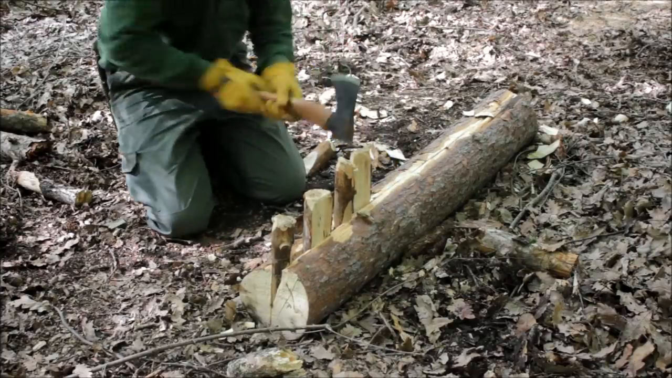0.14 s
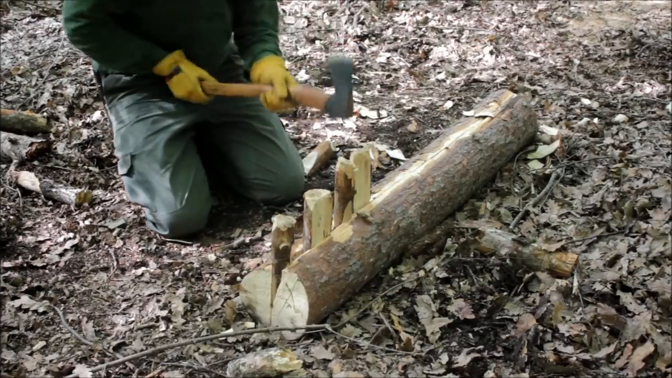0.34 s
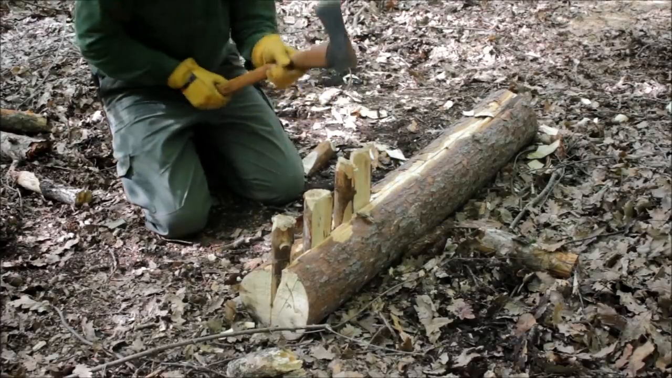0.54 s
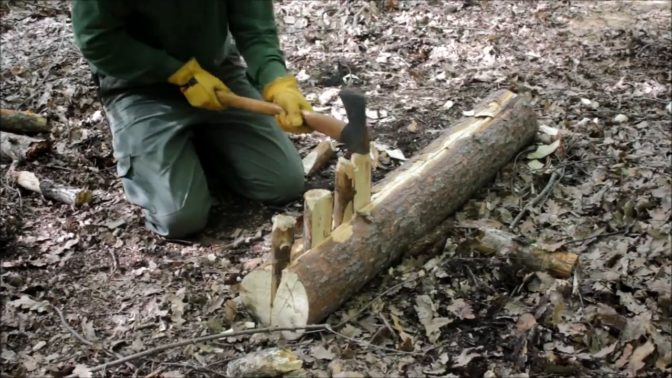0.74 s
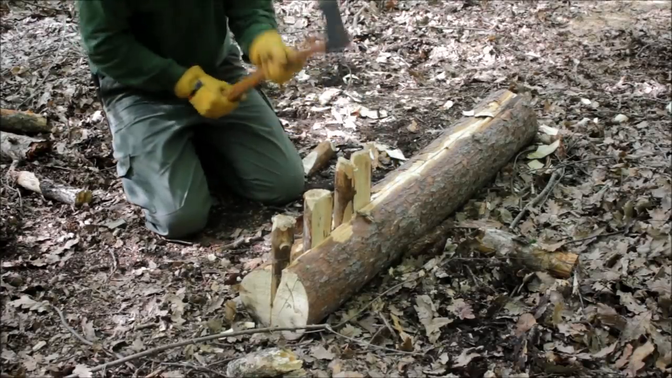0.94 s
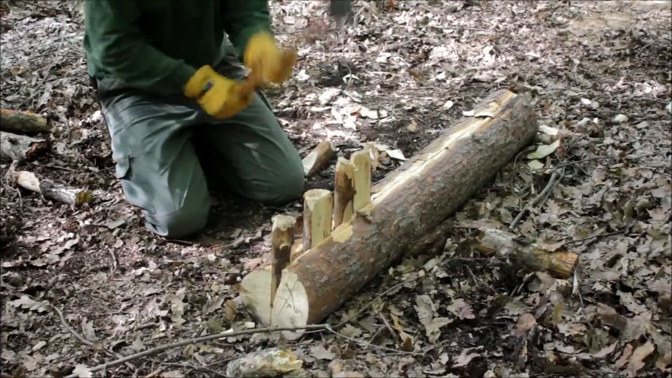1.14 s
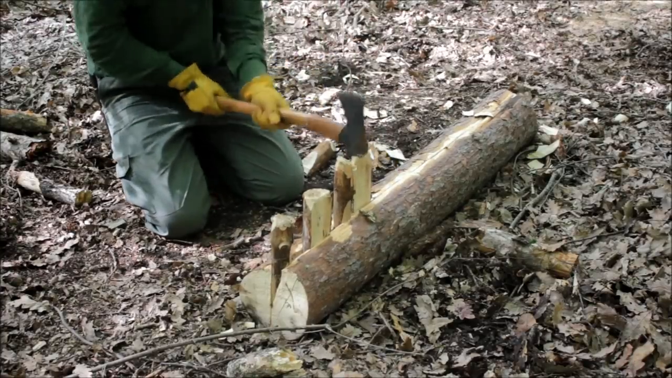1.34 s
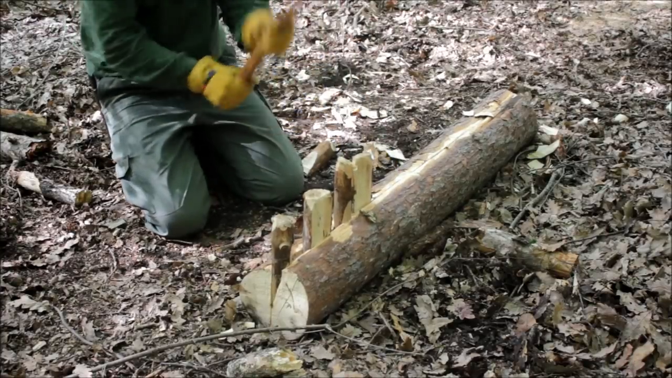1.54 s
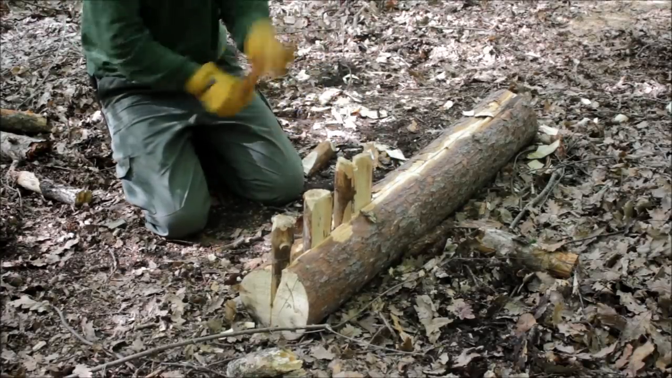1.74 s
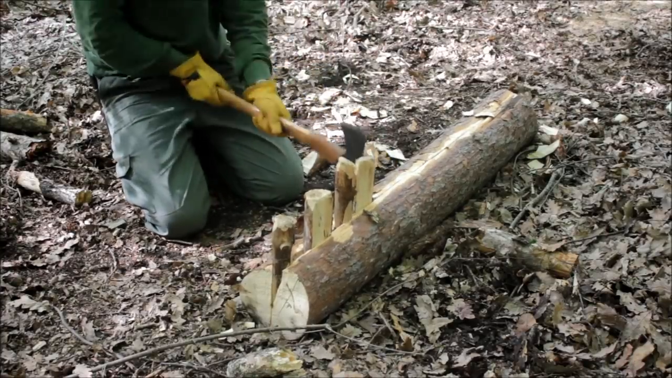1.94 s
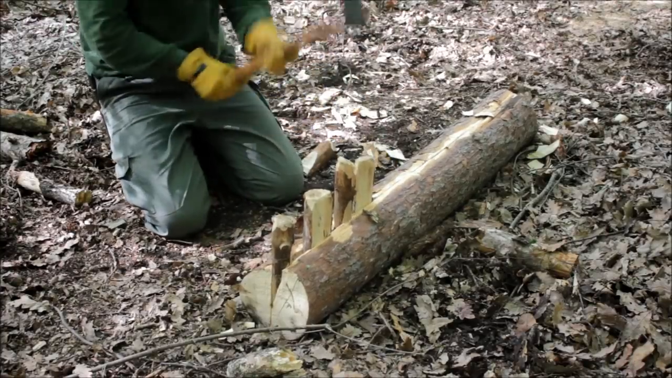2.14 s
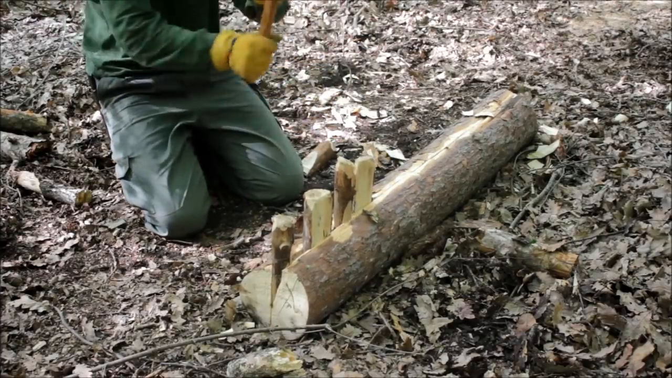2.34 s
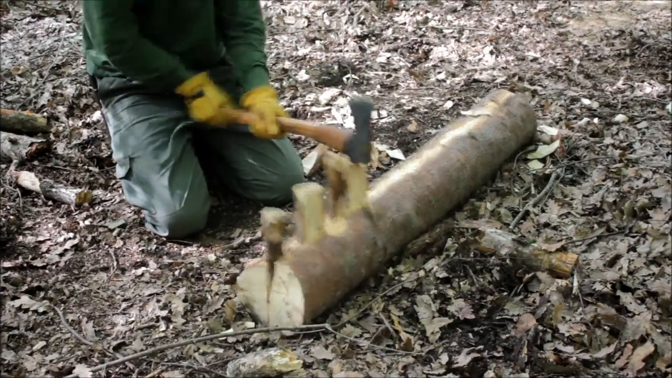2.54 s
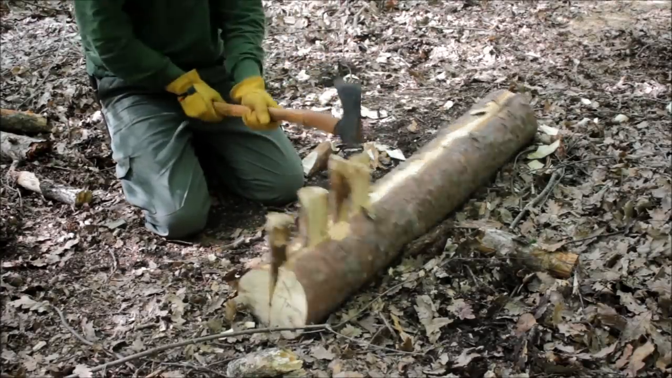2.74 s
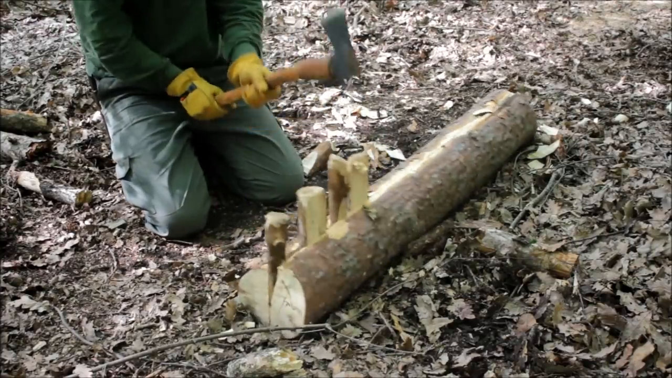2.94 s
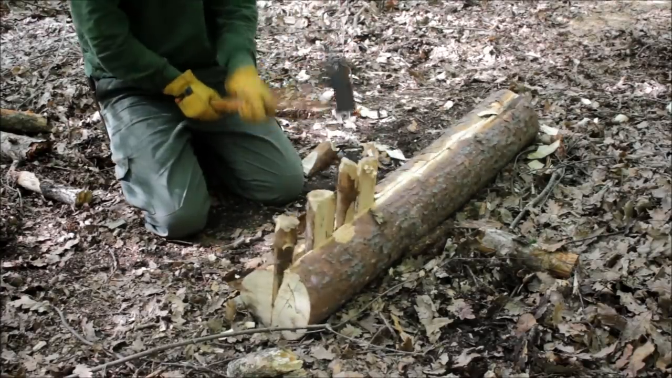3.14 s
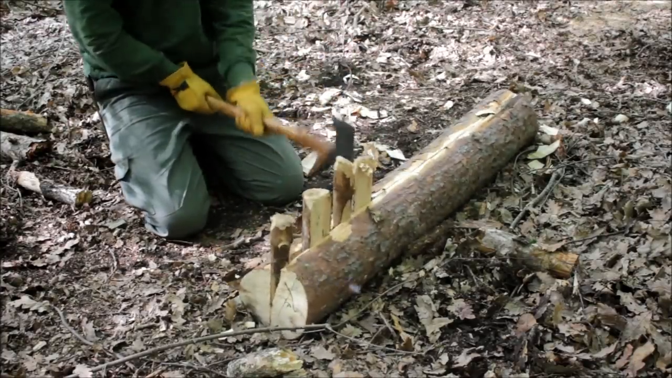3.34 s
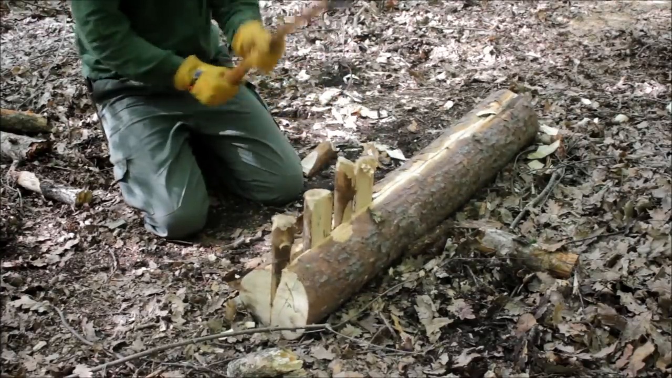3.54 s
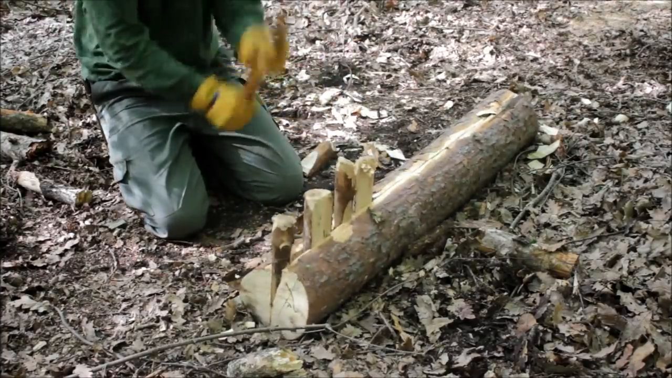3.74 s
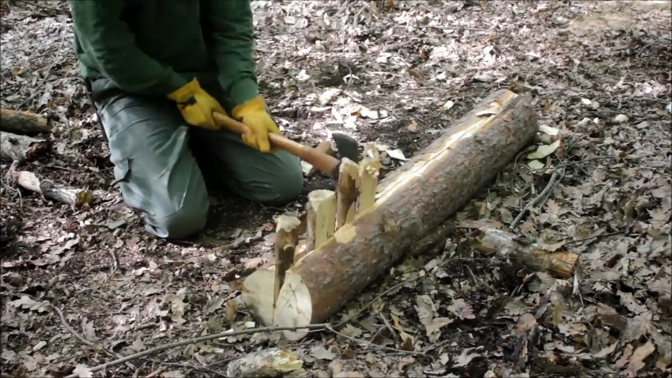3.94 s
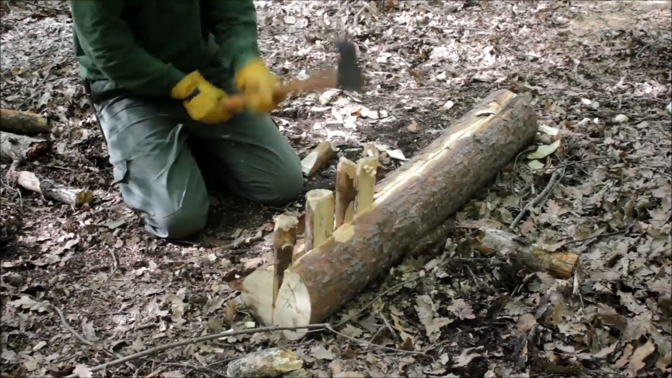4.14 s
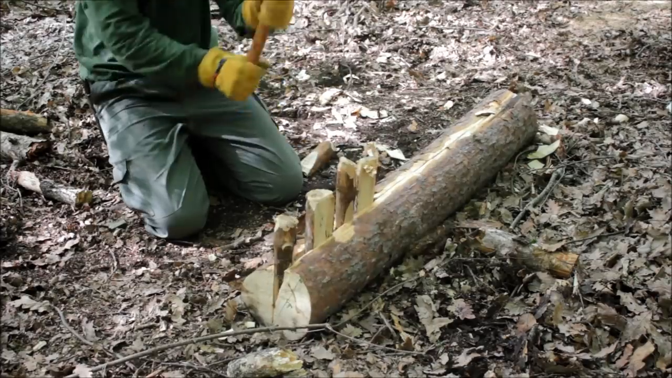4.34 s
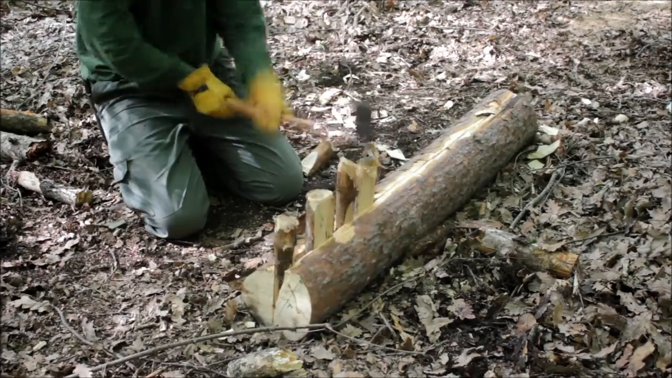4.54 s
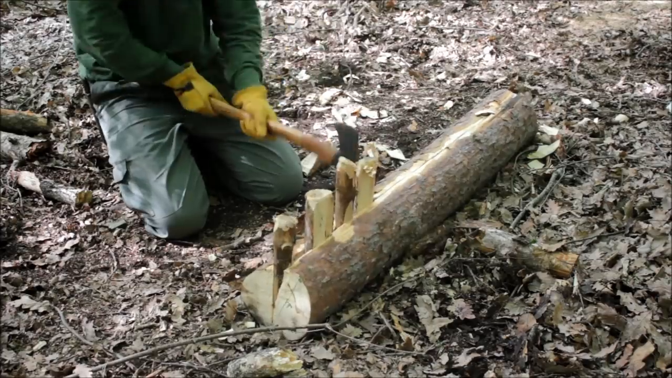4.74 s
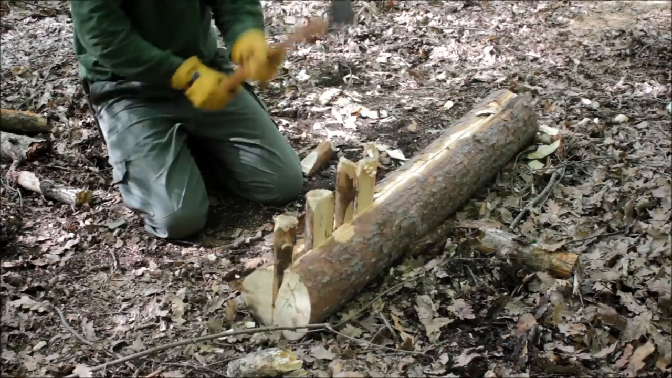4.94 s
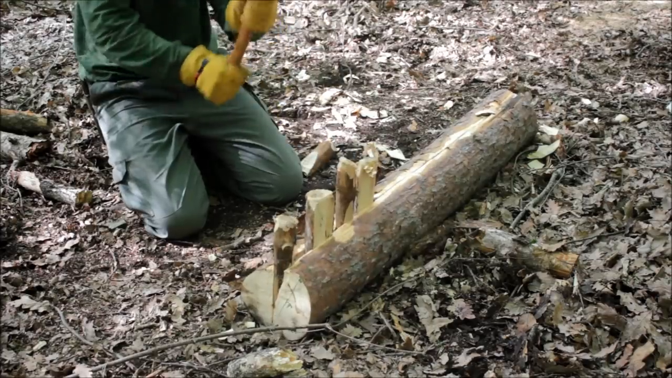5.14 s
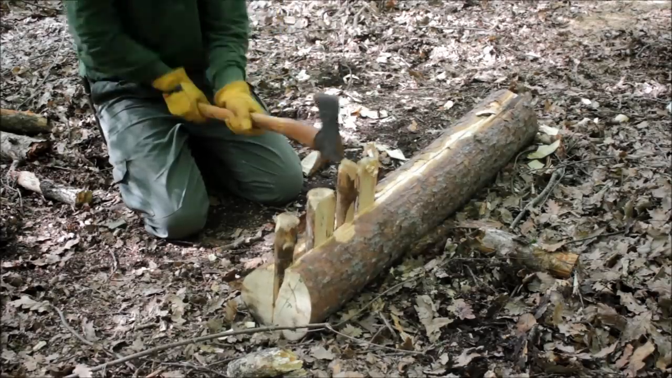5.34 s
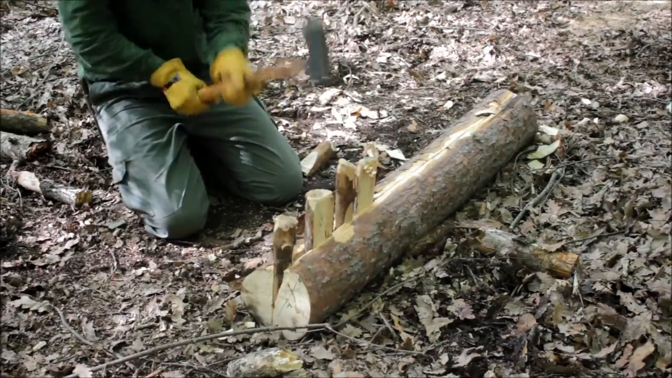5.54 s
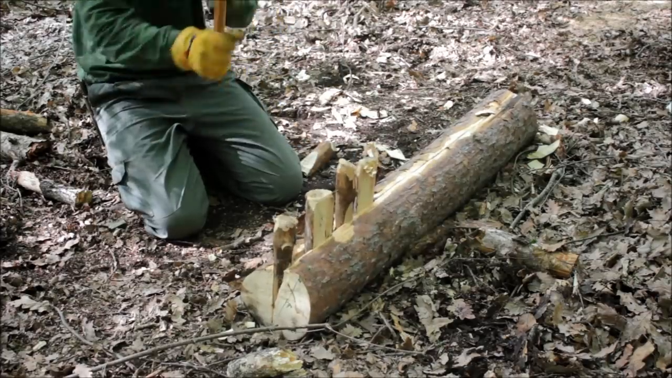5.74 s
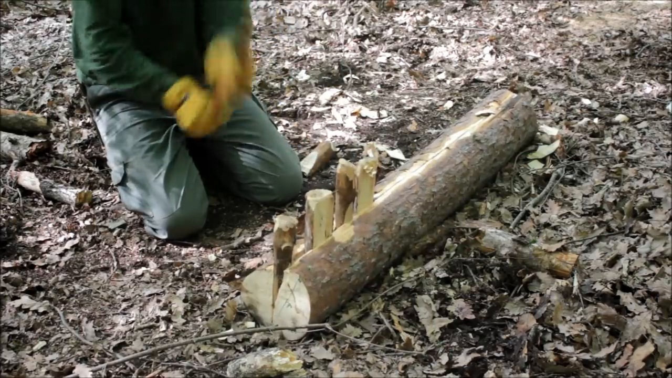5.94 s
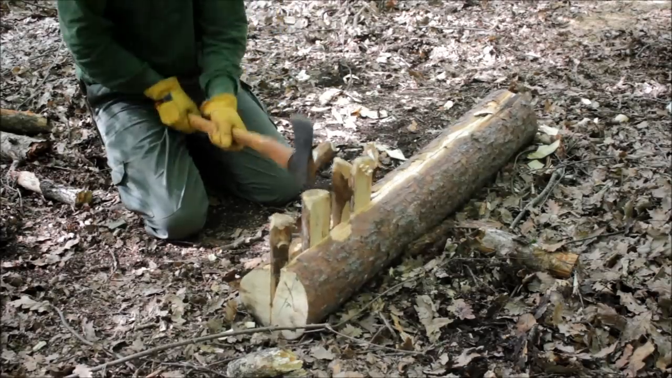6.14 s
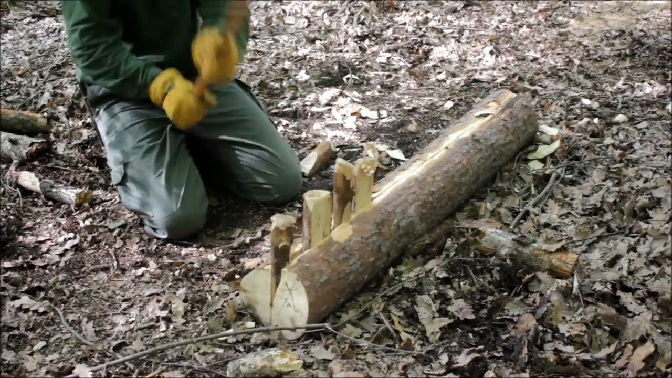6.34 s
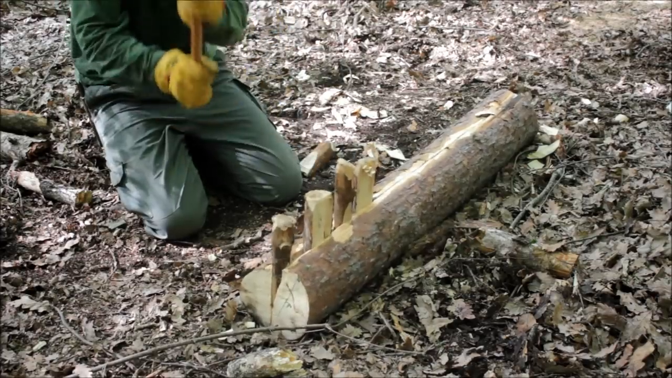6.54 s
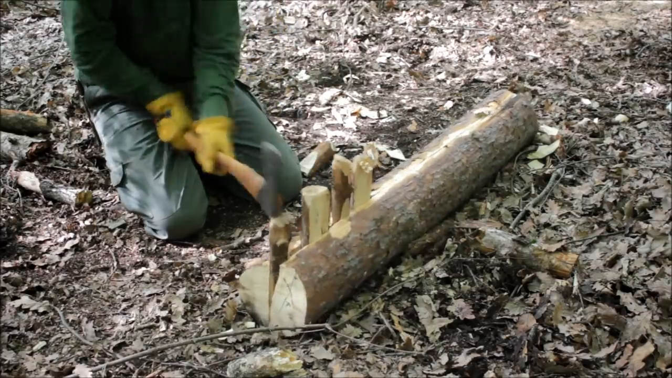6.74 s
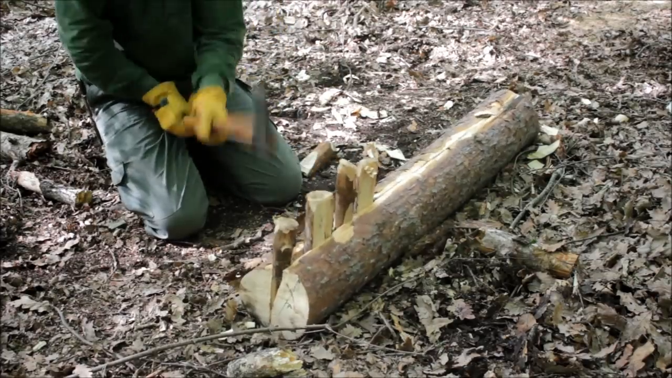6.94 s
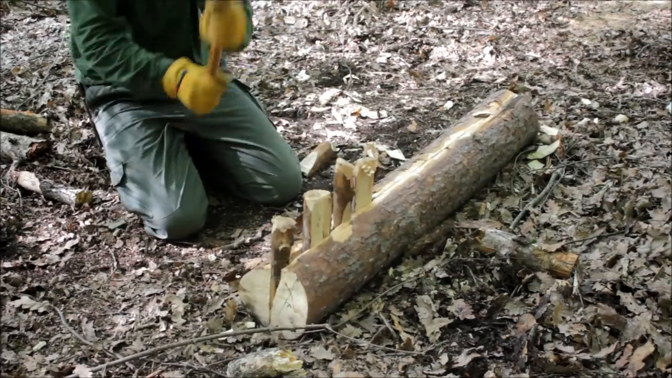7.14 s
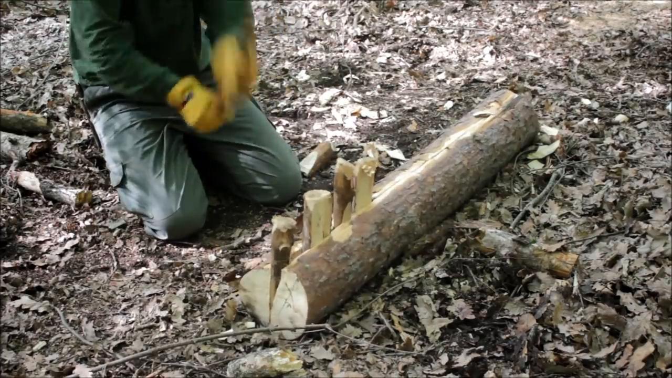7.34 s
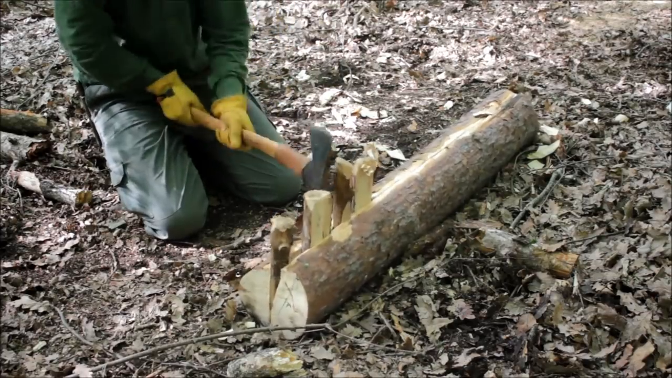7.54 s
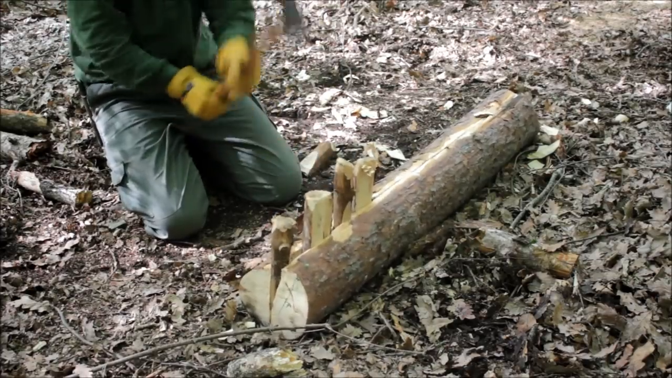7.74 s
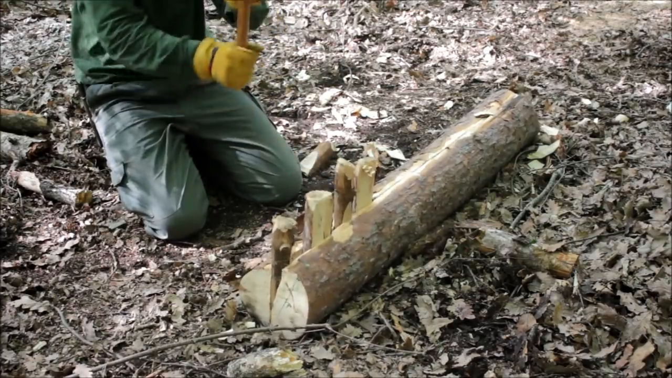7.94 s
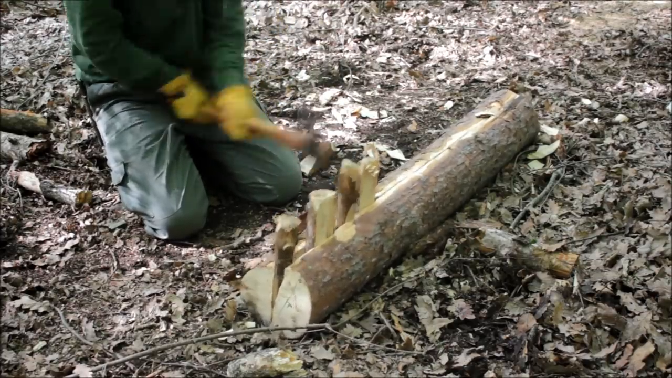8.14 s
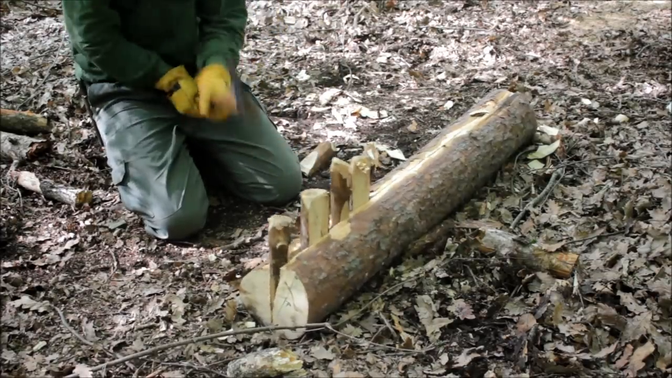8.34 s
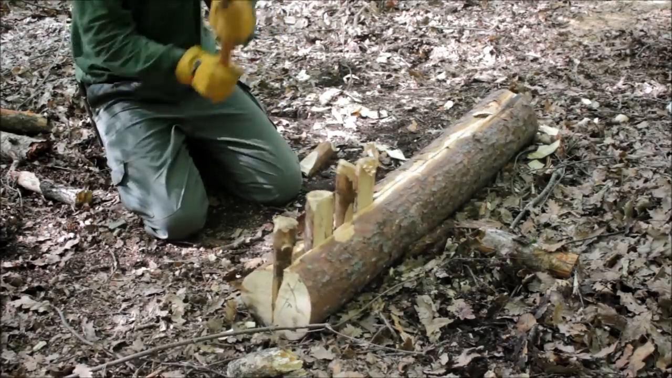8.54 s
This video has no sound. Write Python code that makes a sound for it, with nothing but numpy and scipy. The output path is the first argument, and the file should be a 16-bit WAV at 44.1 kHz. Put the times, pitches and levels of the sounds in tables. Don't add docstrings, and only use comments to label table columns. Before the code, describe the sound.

An axe head pounds wooden wedges in a log at an even pace, each crack clipping loudly, with leaf ticks, faint birdsong and low hum.

```python
import sys
import numpy as np
from scipy import signal
from scipy.fft import rfft, irfft
from scipy.io import wavfile
from scipy.ndimage import uniform_filter1d

SR = 44100
rng = np.random.default_rng(int(sys.argv[2]) if len(sys.argv) > 2 else 0)


def gain_from_db(level_db):
    decades = np.asarray(level_db, float) / 20
    return 10 ** decades


def generate_wav(sig):
    pcm = np.round(np.clip(np.atleast_2d(sig).T, -1, 1) * 32767).astype(np.int16)
    wavfile.write(sys.argv[1], SR, pcm)


N = 379701

# [f/Hz, level/dB per Hz]
WIND_COLOUR = [(20, -25.5), (60, 7.5), (170, -3.5), (400, 0), (800, -10.5), (1500, -16), (3000, -14.5),
               (7000, -17), (12000, -16.5), (16000, -22.5)]
# [f/Hz, level/dB per Hz]
ENGINE_COLOUR = [(35, -13.5), (55, -10.5), (75, 5.5), (95, 5), (130, -40.5)]
# [t/s, level/dB]
ENGINE_LEVEL = [(0.0, -61), (2.18, -59), (2.54, -61), (2.9, -54.5), (5.2, -55.5), (5.35, -57.5),
                (7.17, -86.5), (7.29, -61), (7.63, -65), (8.01, -60), (8.34, -83), (8.61, -60)]
# [f/Hz, level/dB per Hz]
CLOTH_COLOUR = [(80, -4), (300, 5.5), (1000, 4), (3000, 4), (6000, 2.5), (12000, 0.5), (15500, -5.5)]
# [middle t/s, half length/s, level/dB]
RUSTLES = [(0, .1, -48), (0.147, 0.054, -48.5), (0.287, 0.06, -52.5), (0.42, 0.17, -57.5),
           (.568, .024, -62), (1.016, 0.06, -52.5), (2.28, 0.13, -52), (2.803, 0.052, -49),
           (2.94, .055, -56.5), (3.156, 0.055, -56), (4.027, .079, -50), (4.265, 0.15, -57),
           (6.416, 0.087, -56), (7.31, 0.024, -49), (7.925, 0.15, -58.5), (8.27, 0.12, -46.5)]
# [t/s, peak level/dB, brightness/dB]
LEAF_TICKS = [(1.777, -40.5, -8), (2.4254, -36.5, -4), (3.252, -15, 1.5), (3.532, -37, -4.5),
              (3.715, -37, 5), (4.437, -35.5, 1), (4.6972, -32, -2), (5.064, -27, 14), (5.201, -37.5, -3.5),
              (5.5593, -35, 2), (5.627, -35.5, -2), (5.857, -32, -2.5), (6.3664, -22.5, 0.5),
              (6.543, -36, -5), (6.6644, -35, 3), (6.6797, -35, 1), (6.8914, -29.5, -3), (6.984, -29.5, -1),
              (7.185, -36.5, -10), (7.358, -34, 1.5), (7.629, -29.5, -1), (7.6725, -32.5, -1),
              (7.878, -33, 6), (7.966, -35, -4), (8.0227, -32.5, -6), (8.0586, -34.5, 0), (8.3953, -31, 9),
              (8.434, -28.5, -1), (8.4751, -34, -2)]
# [t/s, peak level/dB, brightness/dB]
CHIP_SKIPS = [
    (8.205, -25, 8.5),
    (8.2085, -21, -4),
    (8.246, -23, 5),
    (8.278, -25.5, -3),
    (8.3082, -24.5, 0),
]
# [t/s, peak level/dB, brightness/dB]
KNEE_CRACKLE = [
    (7.215, -46, 14),
    (7.277, -37, 6),
    (7.368, -33, 8),
    (7.697, -38, 16),
    (7.737, -36, 16),
    (7.75, -36, 16),
    (7.766, -37, 11),
    (7.855, -45, -3),
]
# [t/s, length/s, start f/Hz, end f/Hz, level/dB]
CREAKS = [
    (4.048, 0.064, 180, 300, -42.5),
    (4.071, 0.032, 358, 386, -39.5),
]
# [t/s, start f/Hz, level/dB]
RISING_NOTES = [
    (2.428, 4060, -52.5),
    (2.882, 3890, -49.5),
    (3.345, 4060, -57),
    (6.24, 4330, -63),
    (6.588, 4280, -52),
    (6.971, 4150, -56.5),
    (7.175, 4310, -56.5),
    (7.79, 4090, -54.5),
]
# [t/s, length/s, start f/Hz, level/dB]
SAGGING_NOTES = [
    (0, .13, 7400, -51),
    (.77, .13, 4520, -53),
    (2.693, .07, 4880, -52),
    (3.13, .08, 4800, -52),
    (3.36, .14, 8300, -62),
    (4.337, .12, 4620, -51),
    (5.96, .07, 4580, -48),
    (8.078, .074, 6850, -46),
    (8.365, .042, 7800, -50),
]
# [t/s, length/s, start f/Hz, end f/Hz, level/dB]
SLIDING_NOTES = [(2.82, .035, 4610, 5000, -52), (2.887, 0.023, 3180, 3670, -42),
                 (2.923, 0.023, 3815, 4130, -40), (3.572, .024, 4780, 3960, -43),
                 (3.596, 0.019, 4260, 3610, -38), (3.646, 0.022, 3730, 3110, -41),
                 (3.68, 0.0039, 3050, 2686, -46), (3.742, 0.0096, 3560, 3950, -44),
                 (3.779, 0.011, 4040, 3200, -42.5), (3.819, 0.0072, 5050, 4240, -41),
                 (4.476, .08, 4400, 3860, -54.5), (6.445, 0.058, 4580, 5690, -52.5),
                 (7.9, .02, 8250, 8450, -53), (8.07, 0.02, 6100, 6750, -53),
                 (8.343, .033, 6360, 7700, -50.5)]
# [t/s, level/dB]
TRILL_CHIRPS = [
    (8.526, -46),
    (8.535, -36),
    (8.549, -40.5),
    (8.564, -40),
    (8.58, -41.5),
    (8.594, -53),
]
# [t/s, length/s, start f/Hz, end f/Hz, level/dB]
DIVING_NOTES = [
    (7.908, 0.095, 8400, 6050, -45.5),
    (8.405, .033, 6800, 6400, -45),
    (0.78, .05, 4350, 3850, -53),
]
# [f/Hz, level/dB, fall by 60 dB/s, build-up/s]
TRUNK_ECHO = [(180, -57, 0.16, 0.022), (363, -40.5, 1.84, 0.0059), (724, -36, 1.55, .04),
              (1630, -40, 1.93, 0.01), (2060, -43.5, 0.99, 0.027), (2940, -36, 1.41, 0.0027),
              (5130, -31.5, 0.99, .015), (10960, -38, 0.6, 0.021)]
# [t/s, log level/dB, wedge level/dB, wedge top level/dB, crack level/dB]
BLOWS = [(0.67, -28.5, -12, -8, -3.5), (1.231, -24, -10, -6, -3), (1.824, -16, -10, -3, 1.5),
         (2.543, -16, -6.5, -5.5, -9.5), (3.207, -33, -27.5, -17.5, -11.5), (3.216, -31, -28, -20, -16),
         (3.223, -21.5, -24, -28, -24), (3.239, -17, -23.5, -22, -11), (3.846, -9, -7.5, -2, 1),
         (4.576, -9.5, -4, -5, -0.5), (5.307, -18, -6.5, -5.5, -2.5), (6.026, -11, -19, -3.5, -1),
         (6.737, -14, -7, -0.5, 0.5), (7.285, -53, -42, -33, -23), (7.4265, -14.5, -16, -0.5, -2),
         (8.149, -15, -9, -3, -0.5)]
# [f/Hz, level/dB, fall by 60 dB/s]
PRESSED_WOOD = [
    [(280.4, -12.5, 0.024), (367, -7, 0.032), (548, -9.5, 0.025)],
    [(703.6, -5, 0.022), (877, -0.5, 0.013)],
    [(1225, 5.5, 0.0053), (1627, 3.5, 0.0066), (2268, 2.5, 0.0037)],
]
# [f/Hz, level/dB, fall by 60 dB/s]
FREE_WOOD = [
    [(361, -6, .14), (395, -15, .07), (255, -14, .07)],
    [(742, -6, .07), (690, -12, .05), (890, -14, .035)],
    [(1150, -12, .04), (1400, -16, .03)],
]
# [f/Hz, level/dB per Hz]
CRACK_COLOUR = [(700, 17), (1500, -26), (2500, 10), (4000, 10.5), (7000, 2.5), (11000, 4.5), (15000, -1)]


def level(x, db):
    return x * gain_from_db(db) / np.sqrt(np.mean(x ** 2))


def colour(x, table):
    table_hz, db = np.transpose(table)
    hz = np.fft.rfftfreq(len(x), 1 / SR) + 1
    gain = gain_from_db(np.interp(np.log(hz), np.log(table_hz), db, left=-60))
    return irfft(rfft(x) * gain, len(x))


def modes(x, table, detune):
    out = 0
    for k, (hz, db, t60) in enumerate(table):
        pole = np.exp(2j * np.pi * hz * detune / SR - np.log(1000) / (t60 * SR))
        ringing = signal.lfilter([1], [1, -pole], x).imag
        out = out + (-1) ** k * gain_from_db(db) * ringing
    return out


def walk(rate):
    hold = int(SR / rate)
    steps = np.repeat(rng.standard_normal(N // hold + 1), hold)
    return uniform_filter1d(steps, hold)[:N]


def along(curve):
    s, db = np.transpose(curve)
    return gain_from_db(np.interp(np.arange(N) / SR, s, db))


def add(out, s, x):
    i = int(s * SR)
    out[i:i + len(x)] += x[:len(out) - i]


def glide(length, hz, db):
    u = np.arange(int(length * SR)) / (length * SR)
    curve = np.polyfit(np.linspace(0, 1, len(hz)), hz, len(hz) - 1)
    phase = 2 * np.pi * np.cumsum(np.polyval(curve, u)) / SR
    fade = np.minimum(1, 5 * np.minimum(u, 1 - u))
    return gain_from_db(db) * np.sin(phase) * fade * np.sqrt(2)


def air():
    gusts = gain_from_db(1.5 * walk(1.5))
    wind = level(colour(rng.standard_normal(N), WIND_COLOUR) * gusts, -51.5)
    waver = gain_from_db(2.5 * walk(2.1))
    drone = level(colour(rng.standard_normal(N), ENGINE_COLOUR) * waver, 1.5)
    return wind + drone * along(ENGINE_LEVEL)


def rustle():
    t = np.arange(N) / SR
    swells = sum(gain_from_db(db) * np.exp(-((t - s) / half) ** 2) for s, half, db in RUSTLES)
    grit = rng.standard_normal(N) * gain_from_db(1.54 * walk(300) + 3.0 * walk(30))
    return level(colour(grit, CLOTH_COLOUR), 3.9) * swells


def birds():
    rise_s, rise_middle, rise_end = .12, 1.05, 1.21
    sag_per_s = .4
    chirp_s, chirp_start_hz, chirp_end_hz = 0.012, 3130, 3700
    slide_halfway, dive_halfway = 3 / 4, .4
    far_dulling, flutter_db = .35, 4.5
    canopy_db, canopy_t60_s, canopy_top_hz = -36.5, 0.89, 4900

    notes = [(s, rise_s, [hz, hz * rise_middle, hz * rise_end], db) for s, hz, db in RISING_NOTES]
    notes += [(s, length, [hz, hz * (1 - sag_per_s * length)], db) for s, length, hz, db in SAGGING_NOTES]
    trill = [(s, chirp_s, chirp_start_hz, chirp_end_hz, db) for s, db in TRILL_CHIRPS]
    for table, halfway in ((SLIDING_NOTES + trill, slide_halfway), (DIVING_NOTES, dive_halfway)):
        notes += [(s, length, [a, a + halfway * (b - a), b], db) for s, length, a, b, db in table]

    direct, sung = np.zeros(N), np.zeros(N)
    for s, length, hz, db in notes:
        add(direct, s, glide(length, hz, db + far_dulling * (db + 43.5)))
        add(sung, s, glide(length, hz, db))

    t = np.arange(SR) / SR
    lowpass = signal.butter(4, canopy_top_hz, fs=SR)
    leaves = level(signal.lfilter(*lowpass, rng.standard_normal(SR)), canopy_db)
    canopy = leaves * gain_from_db(-60 * t / canopy_t60_s) * np.minimum(t / 0.0076, 1)
    return direct * gain_from_db(flutter_db * walk(120)) + signal.fftconvolve(sung, canopy)[:N]


def litter():
    tick_low_db, tick_top_db, tick_s = -6.5, -17, 0.0017
    stray_db = -51.5
    out, t = np.zeros(N), np.arange(1024) / SR
    stray = [(u * N / SR, stray_db + 6 * v, 12 * w - 8) for u, v, w in rng.random((20, 3))]
    ticks = LEAF_TICKS + CHIP_SKIPS + KNEE_CRACKLE + stray
    for (s, db, bright_db), hiss in zip(ticks, rng.standard_normal((len(ticks), len(t)))):
        low_db, high_db = tick_low_db - bright_db, tick_top_db + bright_db
        tone = [(400, low_db - 15), (2500, low_db - 4.5), (6500, -17.0), (12000, high_db), (16000, high_db)]
        add(out, s, level(colour(hiss, tone), db) * np.exp(-t / tick_s))
    for s, length, start_hz, end_hz, db in CREAKS:
        creak = glide(length, [start_hz, end_hz], db)
        add(out, s, creak * gain_from_db(8.4 * walk(125)[:len(creak)]))
    return out


def forest(x):
    t, echo = np.arange(3 * SR // 2) / SR, 0
    for hz, db, t60, build in TRUNK_ECHO:
        shape = [(hz / 2, -60), (hz / 1.8, -12), (hz, 0), (hz * 1.8, -12), (hz * 2, -60)]
        band = level(colour(rng.standard_normal(len(t)), shape), db - 24)
        build_up = 1 - np.exp(-(t / build) ** 2)
        patches_db = 1.2 * walk(25)[:len(t)]
        echo = echo + band * build_up * gain_from_db(-60 * t / t60 + patches_db)
    return signal.fftconvolve(x, echo)[:N]


def woods():
    ring_db, ring_echo_db, crack_echo_db = 5, -6, -32.5
    tail_db, tail_t60_s = -22, 0.19
    knocks, cracks, near = np.zeros(N), np.zeros(N), np.zeros(N)
    t = np.arange(SR // 2) / SR
    click = 1. * (np.arange(len(t)) == 128)
    chance = rng.standard_normal((len(BLOWS), 2, len(t)))
    for (s, *tone_db, crack_db), (grit, size) in zip(BLOWS, chance):
        detune = 1 + np.tanh(size[0]) / 100
        ring = sum(gain_from_db(g) * modes(click, part, detune) for g, part in zip(tone_db, FREE_WOOD))
        knock = sum(gain_from_db(g) * modes(click, part, 0.937) for g, part in zip(tone_db, PRESSED_WOOD))
        add(knocks, s, gain_from_db(ring_echo_db) * ring + knock)
        add(cracks, s, level(colour(click, CRACK_COLOUR), crack_db + crack_echo_db))
        grains = grit * gain_from_db(16 * uniform_filter1d(size, 64))
        tail = level(colour(grains, CLOTH_COLOUR), crack_db + tail_db)
        tail = tail * gain_from_db(-60 * t / tail_t60_s) * np.minimum(t / 0.018, 1)
        add(near, s + .003, gain_from_db(ring_db) * ring + tail)
    return forest(knocks) + forest(cracks) + near


def axe():
    mic_low_hz, chatter_hz = 213, 2400
    first_touch = 2.24
    contact_s, dull_lingers = 0.0069, .3
    knock_db = (14, 12.5, 2.5)
    crack_gain_db, thud_db, bite_s = 3, -15, 0.00091
    out, t = np.zeros(N), np.arange(SR // 4) / SR
    chance = rng.standard_normal((len(BLOWS), 2, len(t)))
    smooth = signal.butter(2, [mic_low_hz, chatter_hz], "band", fs=SR)
    edge = np.minimum(t / .0002, 1)
    seat = 1 - np.exp(-t / 0.0034)
    shares = (seat, seat, 1.4 - seat)
    for (s, *tone_db, crack_db), (rough, hiss) in zip(BLOWS, chance):
        contact = contact_s * gain_from_db(dull_lingers * (tone_db[2] - crack_db))
        press = edge * np.exp(-(t / contact) ** 4)
        chatter = (rough + first_touch * np.exp(-t / 0.00032)) * press * np.exp(-t / 0.019)
        push = signal.lfilter(*smooth, chatter)
        push = push / np.sqrt(np.sum(push ** 2))
        detune = 1 + 0.021 * hiss[0]
        parts = zip(np.add(tone_db, knock_db), shares, PRESSED_WOOD)
        wood = sum(gain_from_db(g) * modes(push * share, part, detune) for g, share, part in parts)
        bite = edge * np.exp(-t / bite_s) + 0.37 * press * np.exp(-t / 0.0077)
        crack = level(colour(hiss, CRACK_COLOUR), crack_db + crack_gain_db) * bite
        thud = gain_from_db(tone_db[2] + thud_db) * seat * press
        add(out, s + 0.00081, wood + thud + crack)
    return out


def scene():
    return (air() + rustle() + birds() + litter() + woods() + axe())[None]


def roll_off(x):
    return signal.sosfilt(signal.butter(12, 16460, fs=SR, output="sos"), x)


def record(dry):
    clipped = np.clip(dry, -1, 1)
    top_cut = signal.ellip(8, .2, 60, 15800, fs=SR, output="sos")
    return roll_off(signal.sosfilt(top_cut, clipped))


dry = scene()
out = record(dry)
generate_wav(out)
```